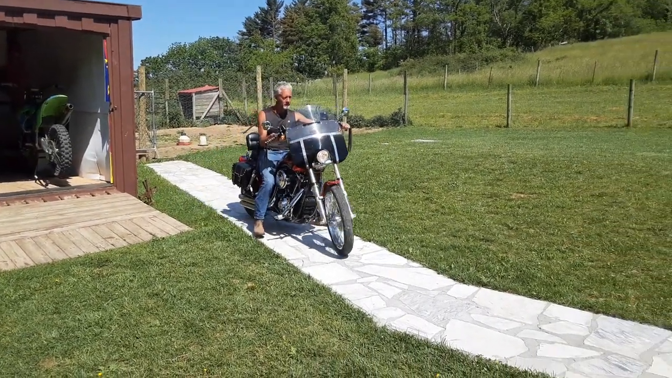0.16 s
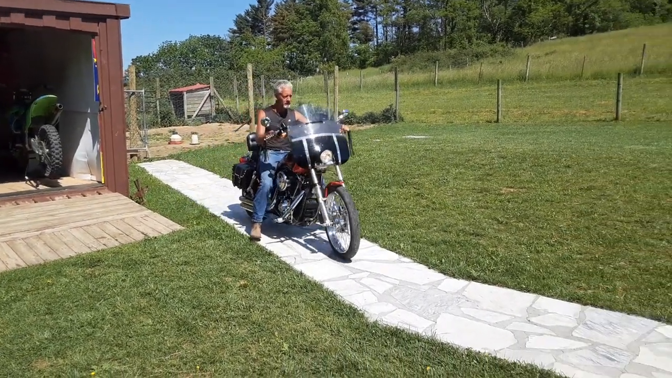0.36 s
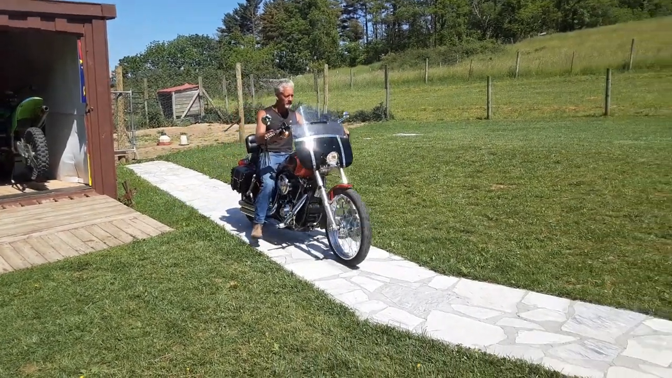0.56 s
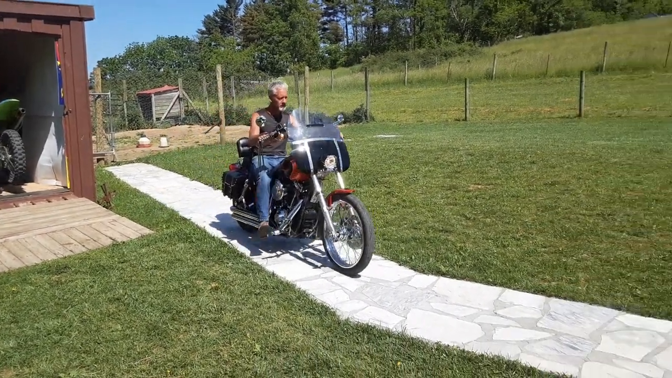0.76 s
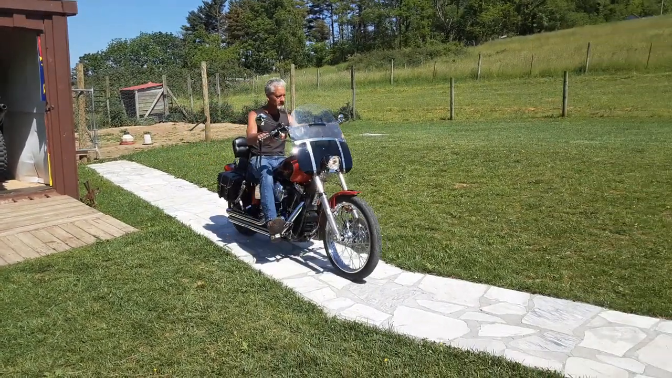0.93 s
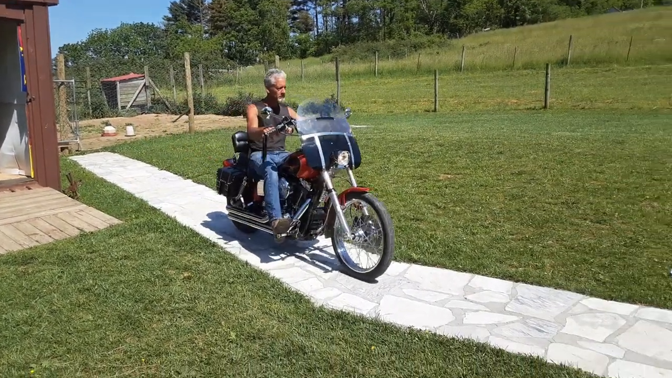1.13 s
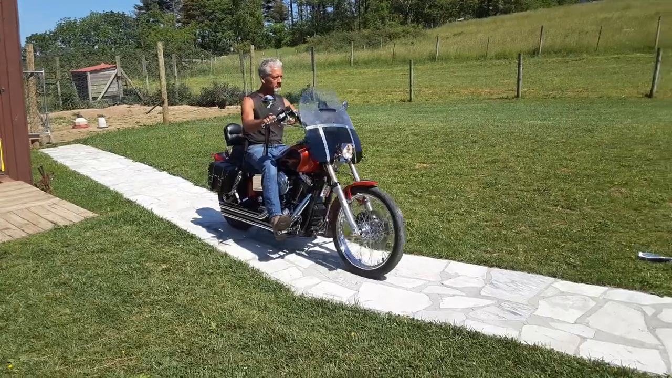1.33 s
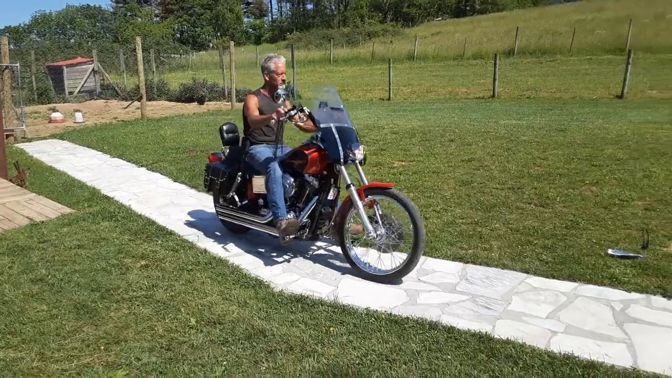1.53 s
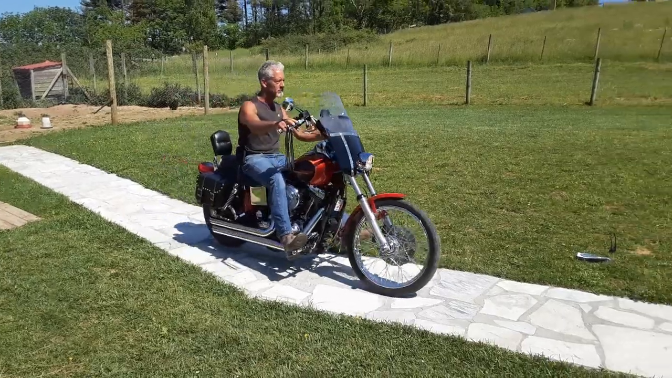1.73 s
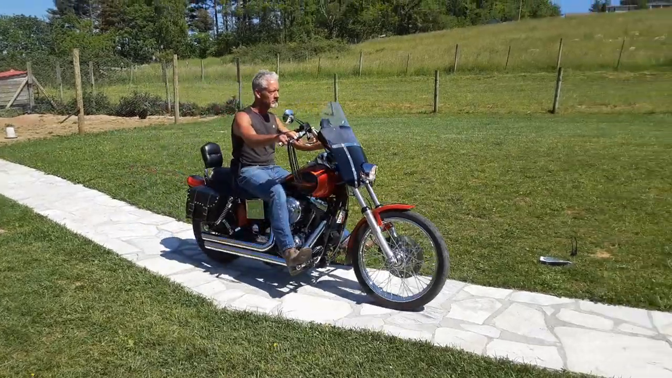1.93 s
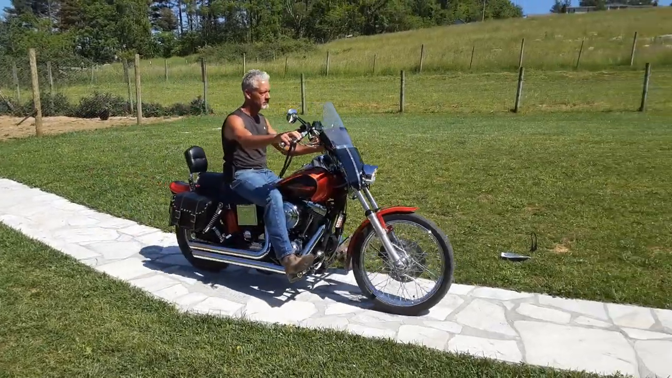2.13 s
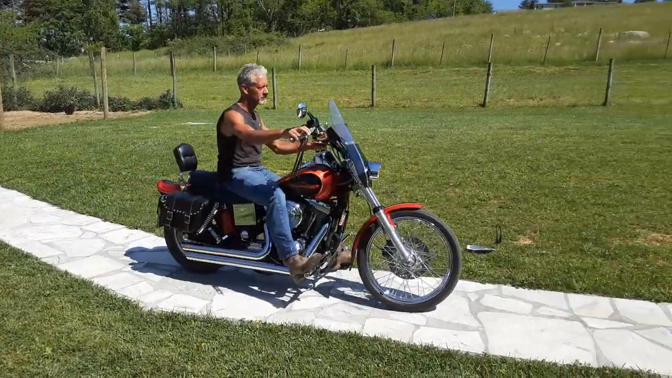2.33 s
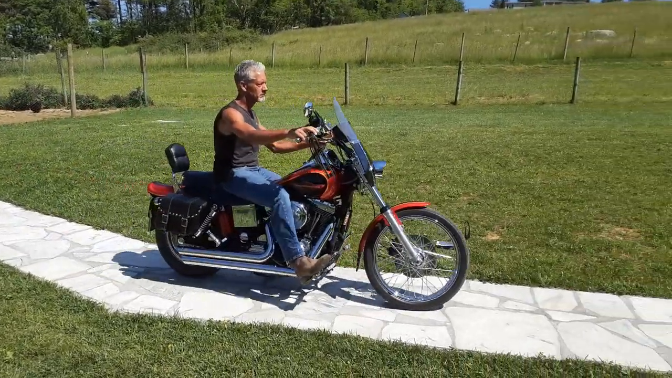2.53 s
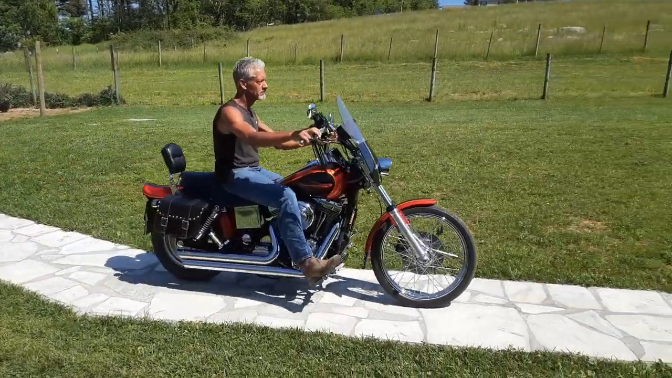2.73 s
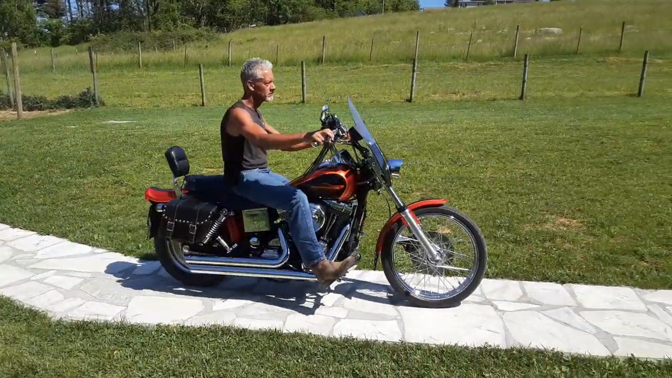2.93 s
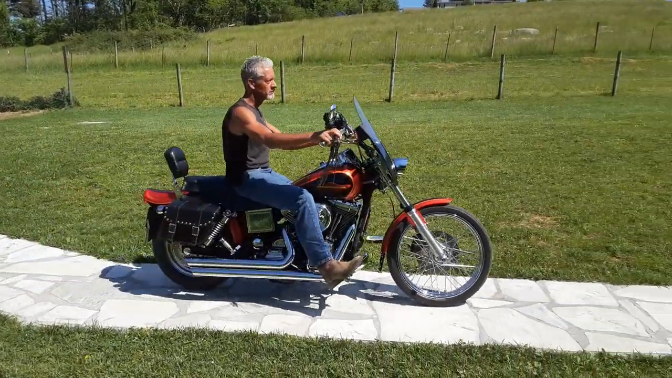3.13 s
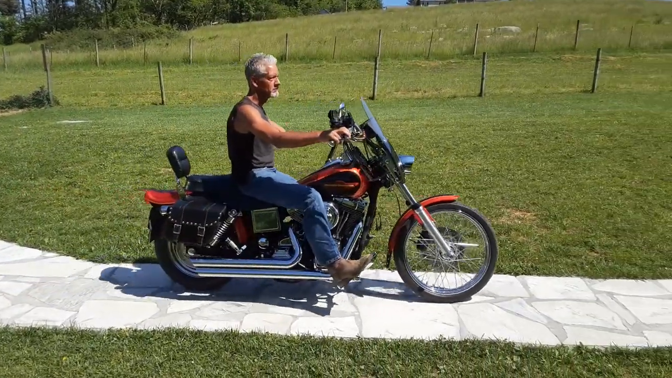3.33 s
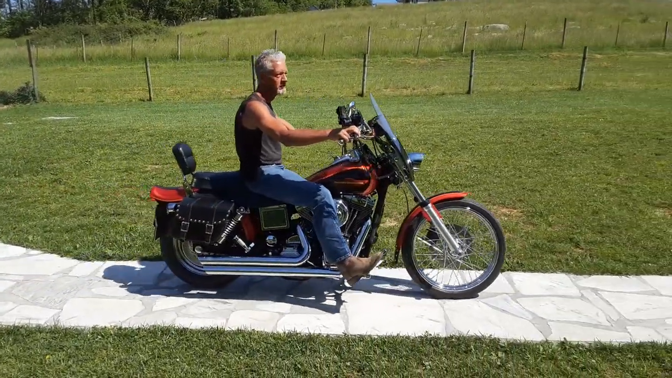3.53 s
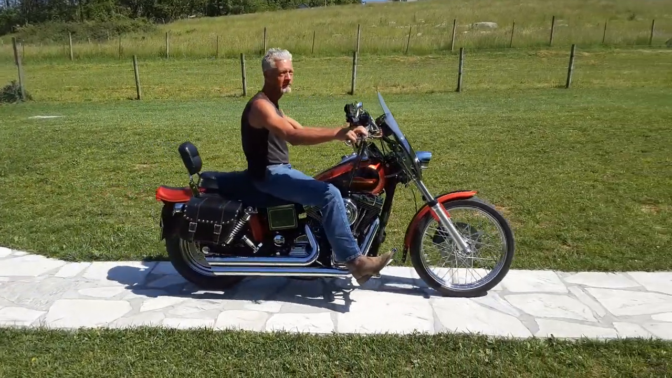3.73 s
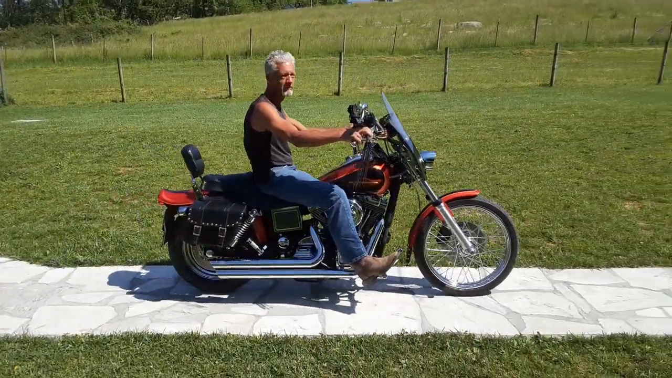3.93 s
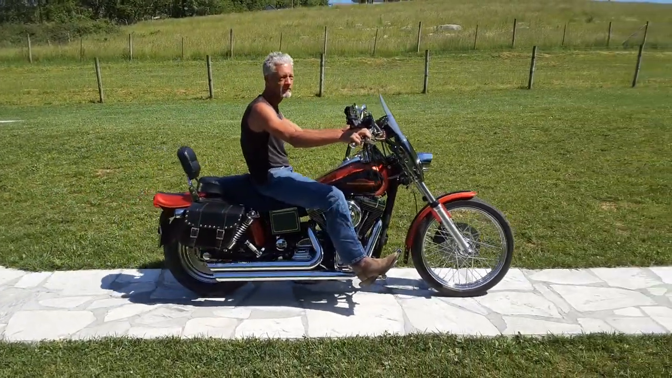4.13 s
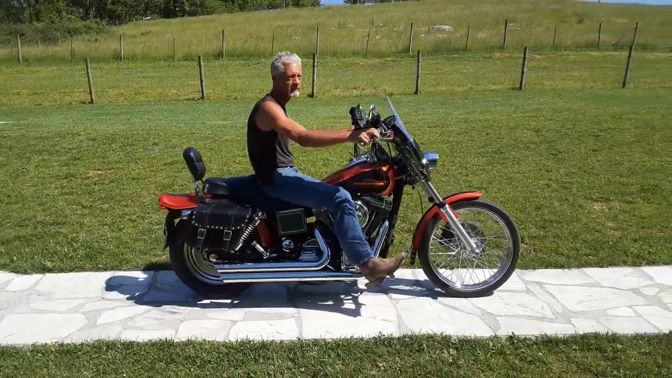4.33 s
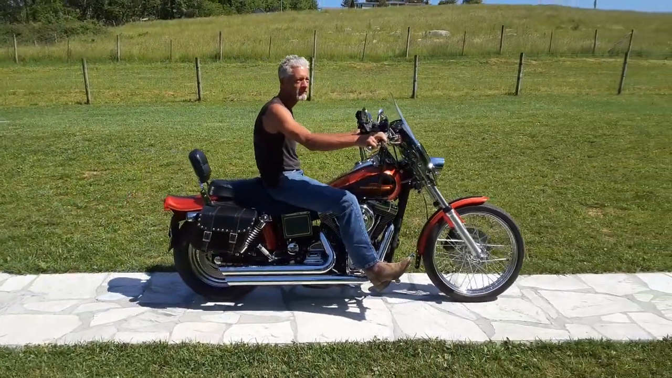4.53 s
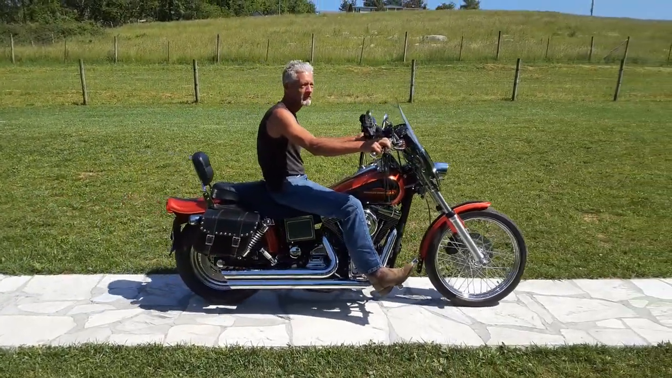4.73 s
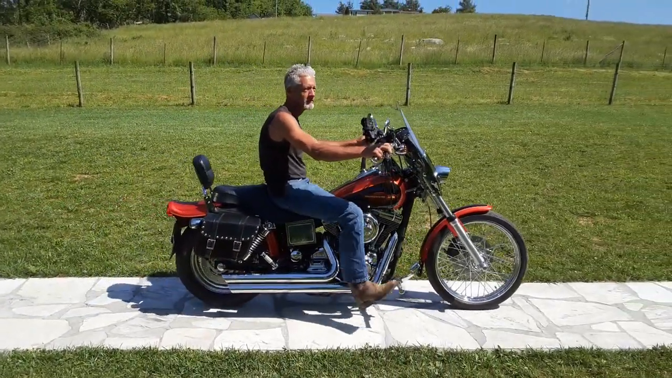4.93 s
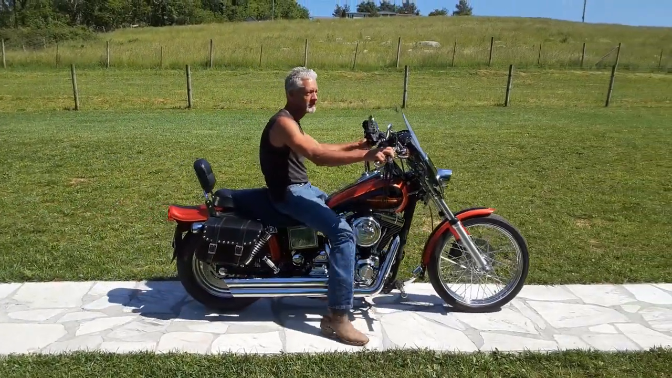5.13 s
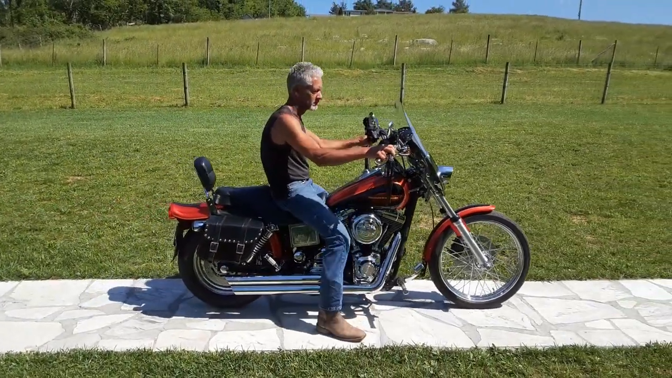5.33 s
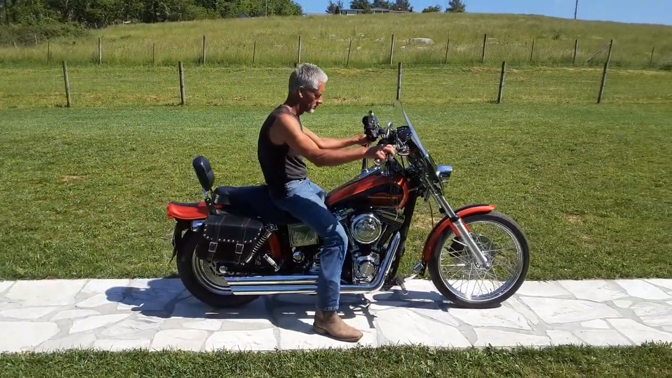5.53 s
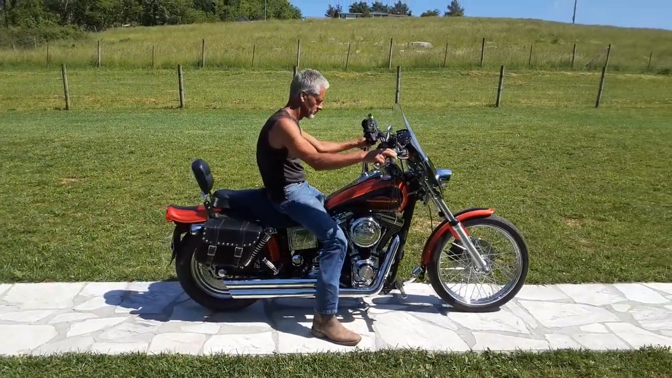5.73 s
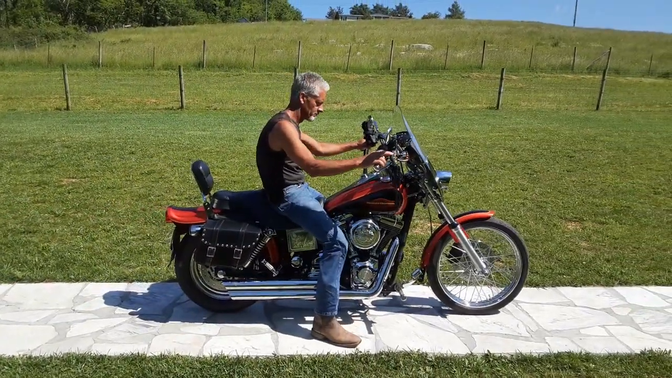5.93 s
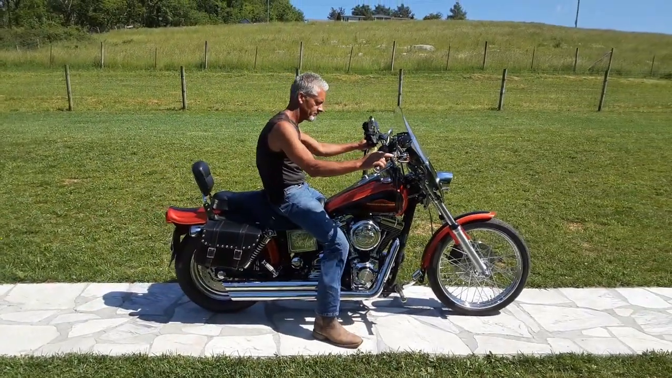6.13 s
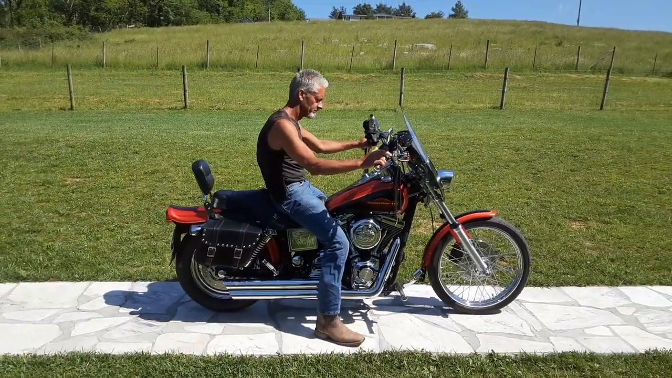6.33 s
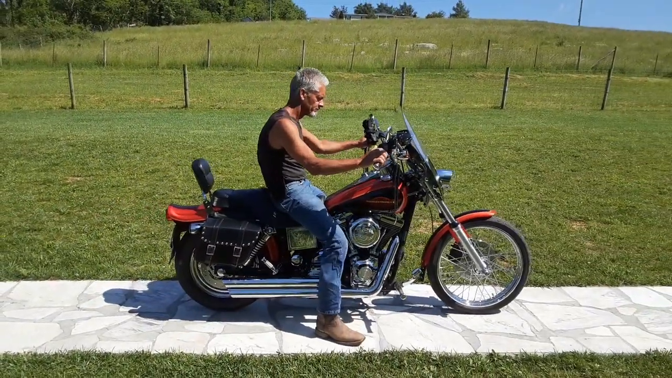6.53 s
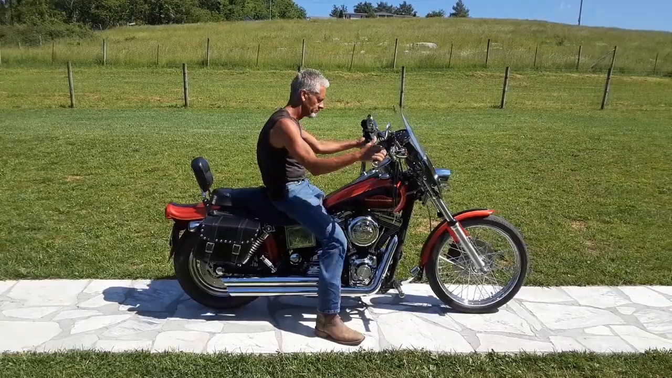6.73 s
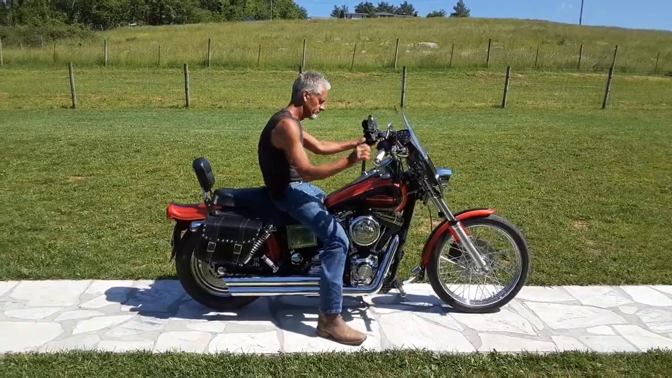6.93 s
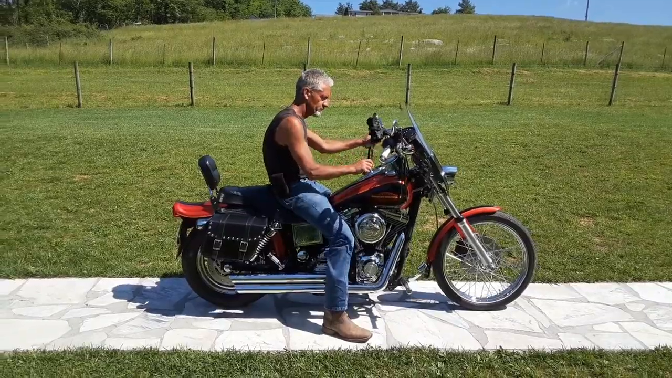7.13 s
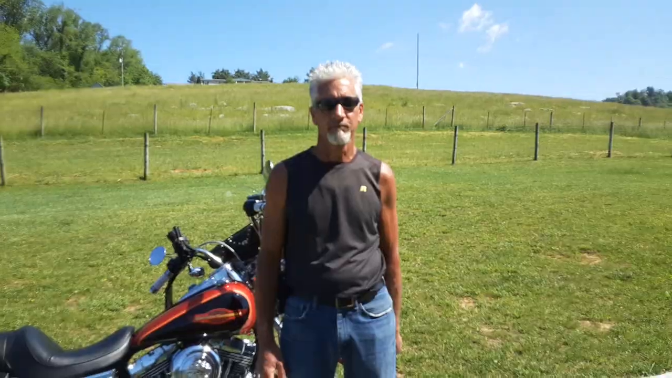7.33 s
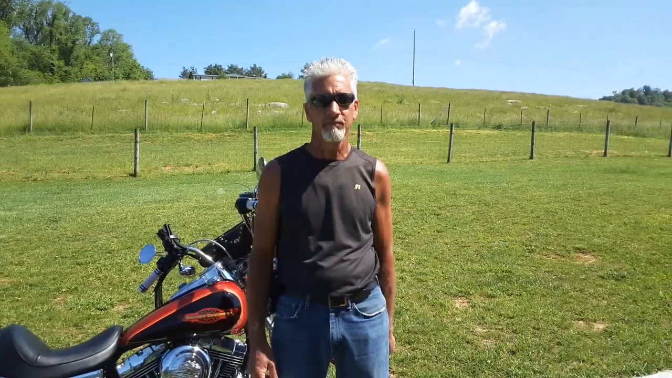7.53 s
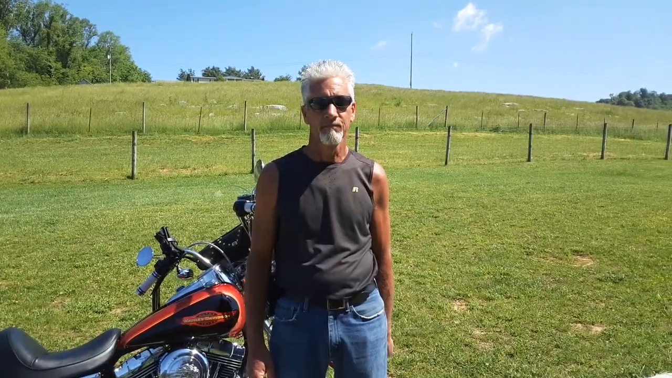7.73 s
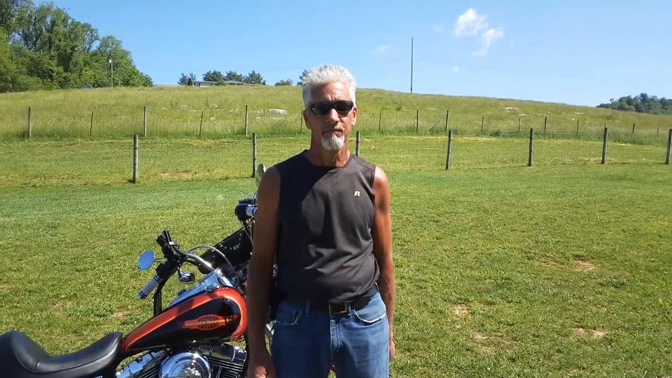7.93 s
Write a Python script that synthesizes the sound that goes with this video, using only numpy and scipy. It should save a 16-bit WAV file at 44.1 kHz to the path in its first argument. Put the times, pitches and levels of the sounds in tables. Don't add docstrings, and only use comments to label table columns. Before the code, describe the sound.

From 0 s a big twin-cylinder motorcycle idles loudly outdoors, at roughly eighteen to twenty firings per second, grouped in an uneven galloping pattern. Each firing gives a low pipe thump, a gritty burst of hiss with a crisp snap, and a hollow silencer bark. During the first two seconds it is most ragged, with misses, weak puffs, stumbles and low hums filling the gaps. It rolls away from a shed toward the microphone, growing heavier by 2 to 3 s while wall reflections lag further behind. From 3 to 6.7 s it chugs close and steadier, with brighter fizz from about 4 s, over gas rumble and mechanical rustle. At 6.74 s it is switched off: weakening puffs slow, low hums swell, a small clack sounds near 7.0 s, and bird notes emerge. At 7.24 s it cuts to near-silent field air, faint machine hum, distant whistles and two soft wind nudges until about 8 s.

```python
import sys
import numpy as np
from scipy import signal
from scipy.fft import rfft, irfft, next_fast_len
from scipy.io import wavfile
from scipy.ndimage import uniform_filter1d

SR = 44100
rng = np.random.default_rng(int(sys.argv[2]) if len(sys.argv) > 2 else 0)


def how_loud(loudness_db):
    steps = np.asarray(loudness_db, float) / 20
    return 10 ** steps


def transcribe(signal):
    frames = np.atleast_2d(signal).T
    limited = np.clip(frames, -1, 1)
    pcm = np.round(limited * 32767).astype(np.int16)
    wavfile.write(sys.argv[1], SR, pcm)


N = 355887
TIME = np.arange(N) / SR
SWITCH_OFF_S, CUT_S = 6.74, 7.241

# t/s, delay/ms, thump share, hiss level/dB
WALL = [(0, 8.3, 0.23, 4.5), (.7, 11.5, 0.27, -1.5), (1.3, 14.7, 0.64, 1.5), (1.85, 16.4, 0.066, 3),
        (2.65, 21.4, 0.13, 1.5), (3.05, 24.2, 0.14, -2), (3.85, 26.4, 0.27, -2.5), (7.2, 27, .21, -7)]
# t/s, valve gear/dB, silencer bark/dB, top fizz/dB
RUNNING = [(0, -43, 3, -8), (1.5, -40.5, 1.5, -9), (3, -38.5, -.8, -8), (4, -44.5, -2.2, -2.5),
           (6.7, -42, -1.5, -4.3), (7.24, -53, 1, 1)]
# f/Hz, density/dB per Hz
JET_SPECTRUM = [(590, -15), (1000, -16.5), (1110, -11.5), (1360, -5.5), (2000, -5), (2220, -5),
                (2810, -5.5), (3050, -5), (3390, -5.5), (5810, -12), (7260, -18.5), (9070, -9),
                (12500, -4.5), (15700, -10.5), (16500, -28)]


def unit(x):
    return x / np.sqrt(np.mean(x ** 2) + 1e-20)


def along(points, hz):
    f, v = np.transpose(points)
    return np.interp(np.log(hz + 1), np.log(f + 1), v)


def curves(rows, at_s):
    s, *cols = np.transpose(rows)
    return [np.interp(at_s, s, c) for c in cols]


def filtered(x, response):
    m = next_fast_len(N + SR // 2)
    return irfft(rfft(x, m) * response(np.fft.rfftfreq(m, 1 / SR)), m)[..., :N]


def modes(table, f):
    return sum(g * 1j * f * w / (c * c - f * f + 1j * f * w) for c, w, g in table)


def placed(rows, times_s):
    at = np.round(times_s * SR).astype(int)[:, None] + np.arange(rows.shape[1])
    return np.bincount(np.clip(at, 0, N).ravel(), rows.ravel(), N + 1)[:N]


def firings():
    # t/s, crank speed/rpm
    speed = [(0, 936.6), (.443, 1245.6), (.526, 1061.3), (1.334, 1086.4), (1.678, 1209.3), (1.686, 1135.5),
             (2.692, 1164.9), (2.919, 1166.8), (3.264, 1211.7), (3.59, 1169.2), (3.948, 1143.6),
             (4.185, 1194.7), (4.854, 1134.6), (5.212, 1205.2), (5.228, 1157.6), (6.114, 1203.9),
             (6.587, 1063.9), (6.9, 1411.3)]
    # t/s, thump/dB, hiss peak/dB, rear outlet's extra hiss/dB
    near = [(0, -9, -27, 1.7), (1, -3.5, -24, 2.5), (2.2, -0.6, -23, 2), (3.2, -0.2, -21, 1.5),
            (4.8, -0.25, -20, 2.5), (6.7, 0, -18, 2)]
    # t/s, thump/dB, hiss/dB, both against a full one
    uneven = [(0.001, 6, 6.5), (0.047, 4, 1), (0.116, 0.9, -12.6), (0.17, -25.5, -12.5), (0.284, 5, 4),
              (0.392, -15.5, -12), (0.488, 1, 4), (0.71, -23, -32), (0.78, -3, 1), (1.045, -8.5, -15.9),
              (1.113, -3.6, -1.7), (1.163, 1.94, 4), (1.269, -2.2, -7), (1.379, 2.5, 0.5),
              (1.481, -1.14, -4.5), (1.689, -3.5, -9.5), (1.905, -37, -22.2), (2.01, 1.3, 5),
              (2.068, -2.5, -0.5), (2.111, -3, -14.4), (2.584, -2.5, -0.5), (2.63, -2, -1.5), (2.892, 3, 2),
              (2.937, -3.0, -10), (3.748, -2.5, -1.5), (4.163, -2.5, -10), (4.422, -0.44, 1.5),
              (5.191, -5.5, -5.5), (6.31, -6, -4), (6.525, -1.2, -10)]
    # t/s, thump/dB, hiss peak/dB
    rundown = [(6.7466, -9, -27.5), (6.8021, -10, -29.5), (6.8662, -18, -29), (6.9494, -20, -35),
               (7.0261, -22, -33), (7.1498, -21.5, -39)]
    strokes = 129
    first_cycle, rear_after_cycle = .0138, .435
    late_s, stumble_s, recover_per_stroke = .0025, .01266, .481
    rear_thump_db, thump_scatter_db, hiss_scatter_db = 2.5, 0.2, 0.7

    stroke = np.arange(strokes)
    rear = stroke % 2
    cycles = np.cumsum(curves(speed, TIME)[0]) / 120 / SR
    s = np.interp(stroke // 2 + first_cycle + rear_after_cycle * rear, cycles, TIME)

    odd_s, *odd_db = np.transpose(uneven)
    change_db = np.zeros((2, strokes))
    change_db[:, np.abs(s[:, None] + .005 - odd_s).argmin(axis=0)] = odd_db

    drag_s = np.where(stroke == 0, late_s, stumble_s * stroke * recover_per_stroke ** stroke)
    s = s + np.convolve(1 - how_loud(change_db[0]), drag_s)[:strokes]

    scatter_db = rng.standard_normal((2, strokes)) * [[thump_scatter_db], [hiss_scatter_db]]
    thump_db, hiss_db, rear_hiss_db = curves(near, s)
    full_db = np.array([thump_db + rear * rear_thump_db, hiss_db + rear * rear_hiss_db])
    powered = np.vstack([np.abs(s), full_db + change_db + scatter_db])
    return np.hstack([powered, np.transpose(rundown)])


def thumps(fired):
    # centre f/Hz, width/Hz, signed strength
    front_pipe = [(79.5, 12.8, -18.1), (116.5, 9.3, 5.0), (146.1, 14.4, 6.7), (159.7, 9.2, 5.0),
                  (273.3, 21.3, 41.7), (281.7, 11.3, -172.6), (285.1, 6.1, 182.2)]
    rear_pipe = [(73.2, 10.9, 5.1), (90.4, 14.4, -48.0), (94.4, 16.2, 32.3), (171.0, 13.6, 61.6),
                 (171.4, 17.2, -53.6), (250.0, 14.0, 13.7), (298.2, 6.5, -18.4)]
    s, db, _ = fired
    delay_ms, share, _ = curves(WALL, s)
    size = 20 * how_loud(db)[:, None]
    start_s = s + .002
    echo_s = start_s + delay_ms / 1000
    out = 0
    for first, pipe, late_ms in ((0, front_pipe, -1.27), (1, rear_pipe, -.06)):
        turn = slice(first, None, 2)
        pulses = placed(size[turn], start_s[turn])
        pulses = pulses + placed((share[:, None] * size)[turn], echo_s[turn])
        out = out + filtered(pulses, lambda f: modes(pipe, f) * np.exp(-2j * np.pi * f * (late_ms - 2) / 1000))

    def low_cut(f):
        high_pass = -f * f / (92 ** 2 - f * f + 1j * f * 92 / 2.87)
        return high_pass / (1 + 1j * f / 150) ** 2

    def paving(f):
        return 1 + .93 * np.exp(-2j * np.pi * f * .00535)

    return how_loud(1.63) * filtered(out, lambda f: low_cut(f) * paving(f))


def bursts(times_s, db, rise_s, fast_t60_s, slow_t60_s, tail_db, peaky_db):
    t = np.arange(4096) / SR
    onset = 1 - np.exp(-(t / rise_s) ** 3)
    white = rng.standard_normal((len(times_s), 2049))
    white = white + np.roll(white, 2, axis=0) + np.roll(white, 4, axis=0)
    narrow = unit(uniform_filter1d(white, size=16, axis=1))
    wide = unit(uniform_filter1d(white, size=160, axis=1))
    colour = how_loud(peaky_db * unit(narrow + wide))
    spectra = rfft(rng.standard_normal((2, len(times_s), len(t)))) * colour
    spectra = spectra / np.sqrt(np.mean(np.abs(spectra) ** 2, axis=2, keepdims=True) / len(t))

    dull = 1 / np.sqrt(1 + (np.fft.rfftfreq(len(t), 1 / SR) / 5000) ** 2)
    head = onset * how_loud(-60 * t / fast_t60_s)
    tail = onset * how_loud(tail_db - 60 * t / slow_t60_s)
    rows = irfft(spectra) * head / head.max() + irfft(spectra * dull) * tail
    return np.array([placed(r * how_loud(db)[:, None], times_s) for r in rows])


def hiss(fired):
    # f/Hz, level/dB
    wall_tilt = [(900, -12.5), (2000, -1), (4500, 0.5), (9000, 4), (16000, -4)]
    # f/Hz, width/Hz, level/dB
    tube_modes = [(1349, 44, -2.5), (1823, 79, -2.5), (2232, 95, -0.5), (2550, 104, -3.5), (3027, 290, -1),
                  (3660, 160, -2.5)]
    s, _, db = fired
    delay_ms, _, wall_db = curves(WALL, s)
    jet = bursts(s - .002, db + 10.0, rise_s=.0048, fast_t60_s=.024, slow_t60_s=.17, tail_db=-5.0, peaky_db=4.0)
    echo_db = db + 6.5 + wall_db + 0.73 * rng.standard_normal(len(s))
    echo = bursts(s + delay_ms / 1000, echo_db, rise_s=.0019, fast_t60_s=.024, slow_t60_s=.19,
                  tail_db=-3.0, peaky_db=3.0)

    ends = [(c, w, how_loud(mode_db + 2.5)) for c, w, mode_db in tube_modes]
    direct = filtered(jet, lambda f: how_loud(along(JET_SPECTRUM, f) - 2.5) * (1 + modes(ends, f)))
    wall = filtered(echo, lambda f: how_loud(along(JET_SPECTRUM, f) + along(wall_tilt, f)))
    both = direct + wall
    fizz = filtered(both, lambda f: 1 / (1 + (11000 / (f + 1)) ** 8))
    return both + (how_loud(curves(RUNNING, TIME)[2]) - 1) * fizz


def cracks(fired):
    crack_db, t60_s, lowest_hz = 1.5, .004, 9500
    s, _, db = fired
    t = np.arange(400) / SR
    level_db = db + crack_db + 3 * rng.standard_normal(len(s))
    snap = rng.standard_normal((len(s), len(t))) * how_loud(-60 * t / t60_s) * how_loud(level_db)[:, None]
    high = filtered(placed(snap, s + .001), lambda f: 1 / (1 + (lowest_hz / (f + 1)) ** 6))
    return high * np.array([[1], [.3]])


def silencer(fired):
    # f/Hz, width/Hz, level/dB
    chambers = [(316, 10, 13), (525.4, 24, 3), (716.5, 67, 3.5), (905, 47, -12)]
    s, thump_db, hiss_db = fired
    db = 0.27 * thump_db + 0.52 * hiss_db + 6.5 + curves(RUNNING, s)[1]
    puff = bursts(s - .003, db, rise_s=.00078, fast_t60_s=.01, slow_t60_s=.38, tail_db=-11.5, peaky_db=-3.0)
    echo_s = s + curves(WALL, s)[0] / 1000
    echo = bursts(echo_s, db - 7, rise_s=.0016, fast_t60_s=.015, slow_t60_s=.15, tail_db=-10, peaky_db=1.6)
    ringing = [(c, w, (-1) ** k * how_loud(mode_db)) for k, (c, w, mode_db) in enumerate(chambers)]
    return filtered((puff + echo) * np.array([[1], [.4]]), lambda f: modes(ringing, f))


def coasting():
    # t/s of the top, level/dB
    pumps = [(.2, -20), (.42, -19), (.745, -25), (1.085, -19), (1.93, -20), (6.78, -26), (6.83, -26),
             (6.906, -15), (6.99, -18.5), (7.06, -18.5), (7.16, -27), (7.235, -23)]
    # t/s, f/Hz, level/dB, t60/s
    clack = (7.022, 1420, -31, .06)
    hot_pipe_hz, pipe_hz, sag_from_s, sag_hz_per_s = 84, 77.8, 7.12, 80
    fall_db_per_s = 300
    cooling_hz = pipe_hz - sag_hz_per_s * np.clip(TIME - sag_from_s, 0, None)
    phase = 2 * np.pi * np.cumsum(np.where(TIME < SWITCH_OFF_S, hot_pipe_hz, cooling_hz)) / SR
    swell = sum(how_loud(db - fall_db_per_s * np.abs(TIME - s)) for s, db in pumps)
    pipe_hum = swell * (np.sin(phase) + how_loud(-11) * np.sin(1.7 * phase))

    s, clack_hz, clack_db, t60_s = clack
    t = np.clip(TIME - s, 0, None)
    return pipe_hum + how_loud(clack_db - 60 * t / t60_s) * np.sin(2 * np.pi * clack_hz * t)


def running():
    # f/Hz, density/dB per Hz
    rumble_spectrum = [(15, -79), (25, -65), (55, -4), (75, -3.5), (102, -9.5), (160, -8), (204, -15),
                       (288, -9), (389, -27), (667, -24.5), (900, -35), (1170, -44), (1980, -120)]
    # t/s, level/dB
    gas = [(0, -25.5), (4, -22), (6.75, -25.5), (6.95, -28.5), (7.24, -41.5)]
    dulling_db_per_s = 25
    rumble = unit(filtered(rng.standard_normal((2, N)), lambda f: how_loud(along(rumble_spectrum, f))))
    upper = filtered(rumble, lambda f: 1 / (1 + (200 / (f + 1)) ** 4))
    upper_gain = how_loud(-dulling_db_per_s * np.clip(TIME - SWITCH_OFF_S, 0, None))
    rumble = rumble + (upper_gain - 1) * upper
    whirr = filtered(rng.standard_normal((2, N)), lambda f: how_loud(along(JET_SPECTRUM, f)) / (1 + (f / 9000) ** 2))
    gas_noise = how_loud(curves(gas, TIME)[0]) * rumble * np.array([[1], [.5]])
    return gas_noise + how_loud(curves(RUNNING, TIME)[0]) * unit(whirr)


def ports(pair, lead_ms):
    # f/Hz, left over right/dB
    left = [(60, -0.5), (110, 1.5), (200, -0.5), (380, 1), (700, 0), (1290, -0.5), (2380, 5), (4400, 4.5),
            (8120, 1.5), (13000, 4)]
    # f/Hz, correlation 0-1
    alike = [(60, 0.71), (300, 0.89), (700, 0.63), (1500, 0.75), (3000, 0.52), (6000, 0.15), (15000, 0)]

    def mix_angle(hz):
        return np.arccos(np.clip(along(alike, hz), 0, 1)) / 2

    def half(hz):
        return how_loud(along(left, hz) / 2) * np.exp(1j * np.pi * hz * lead_ms / 1000)

    a, b = filtered(pair, lambda hz: np.array([np.cos(mix_angle(hz)), np.sin(mix_angle(hz))]))
    return filtered(np.array([a + b, a - b]), lambda hz: np.array([half(hz), 1 / half(hz)]))


def birds():
    # t/s, length/s, f/Hz, rise/Hz, level/dB
    arches = [
        (7.385, 0.096, 4150, 950, -56.5),
        (7.453, 0.14, 2100, 310, -63),
        (7.76, .115, 2170, 230, -62),
    ]
    # t/s, length/s, f/Hz, change/Hz, level/dB
    slides = [(6.95, 0.05, 3870, -50, -53.5), (6.985, 0.065, 3230, -40, -54), (7.147, .097, 3215, 22, -49),
              (7.245, 0.042, 2570, -40, -60), (7.81, .035, 2720, -150, -62), (7.96, 0.077, 4500, -800, -65)]

    def arch(u):
        return np.abs(np.sin(np.pi * u ** 1.9))

    def slide(u):
        return u ** 2.5

    out = np.zeros(N)
    warble = 1 + .008 * unit(uniform_filter1d(rng.standard_normal(N), size=150))
    for notes, bend in ((arches, arch), (slides, slide)):
        for s, length_s, hz, change_hz, db in notes:
            u = np.clip((TIME - s) / length_s, 0, 1)
            swell = np.abs(np.sin(np.pi * u)) ** 0.5 * (u < 1)
            phase = 2 * np.pi * np.cumsum((hz + change_hz * bend(u)) * warble) / SR
            out += swell * how_loud(db) * np.sin(phase)
    flutter = unit(uniform_filter1d(rng.standard_normal((2, N)), size=300, axis=1))
    return out * how_loud(5.5 * flutter)


def field():
    # f/Hz, density/dB per Hz
    air_spectrum = [(18, -48), (30, -4.5), (233, -6), (801, -21.5), (1320, -17.5), (1430, -20.5),
                    (2230, -18), (5740, -24), (7870, -34.5), (12000, -25.5), (16000, -39)]
    # t/s, level/dB, length/s
    gusts = [
        (7.5, -60, .05),
        (7.862, -55, .025),
    ]
    # f/Hz, level/dB
    machinery = [(172.3, -69), (355.3, -73), (414.5, -73), (532.9, -87), (1362, -76)]
    air = unit(filtered(rng.standard_normal((2, N)), lambda f: how_loud(along(air_spectrum, f))))
    nudge = unit(filtered(rng.standard_normal(N), lambda f: modes([(75, 35, 1)], f) ** 2))
    push = sum(how_loud(db) * np.exp(-((TIME - s) / length_s) ** 2) for s, db, length_s in gusts)
    hum = sum(how_loud(db) * np.sin(2 * np.pi * hz * TIME) for hz, db in machinery)
    return how_loud(-57) * ports(air, lead_ms=-0.13) + push * nudge + hum


def scene():
    fired = firings()
    low = (thumps(fired) + coasting()) * np.array([[1], [.05]])
    engine = low + hiss(fired) + cracks(fired) + silencer(fired) + running()
    return ports(engine, lead_ms=.16) * (TIME < CUT_S) + field() * (TIME > CUT_S) + birds()


def band_limit(x):
    return signal.sosfilt(signal.butter(12, 16970, fs=SR, output="sos"), x)


def record(dry):
    soft = dry / (1 + np.abs(dry / 1.1) ** 6) ** (1 / 6)
    mix = filtered(soft, lambda f: 1 / (1 + (f / 15900) ** 60))
    return band_limit(mix)


dry = scene()
out = record(dry)
transcribe(out)
```